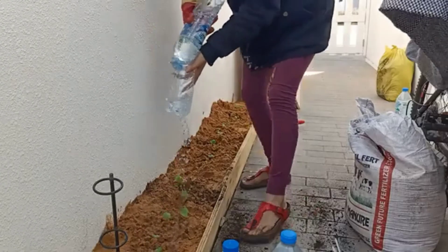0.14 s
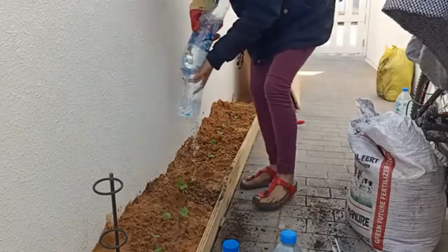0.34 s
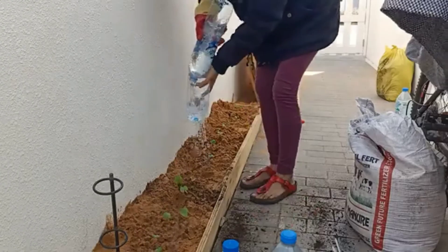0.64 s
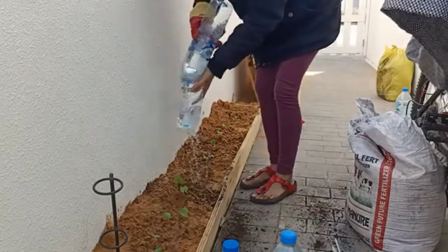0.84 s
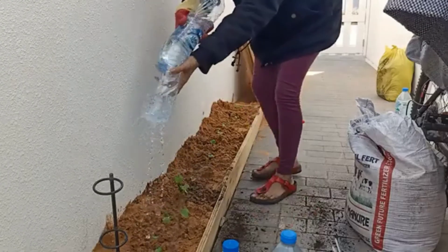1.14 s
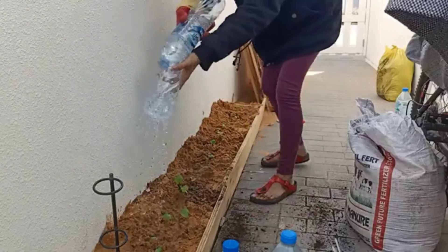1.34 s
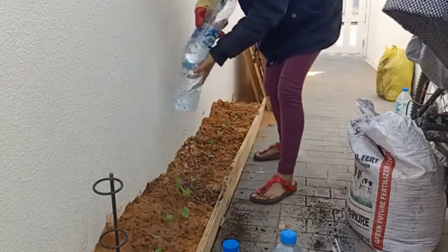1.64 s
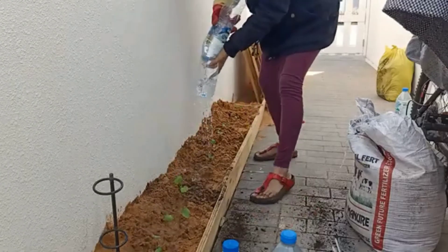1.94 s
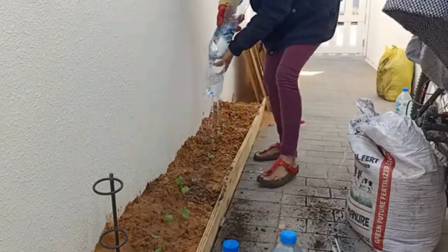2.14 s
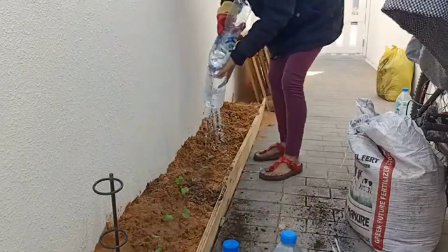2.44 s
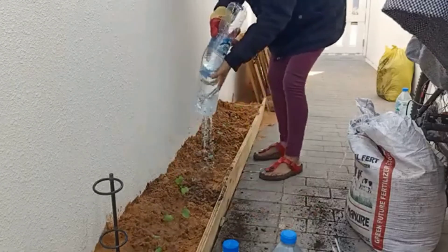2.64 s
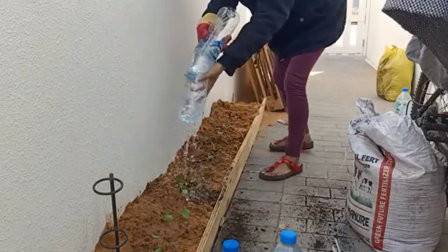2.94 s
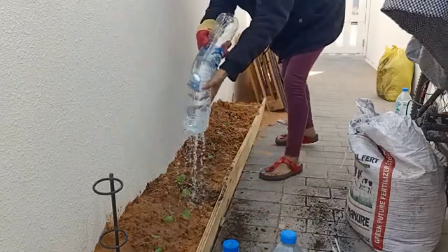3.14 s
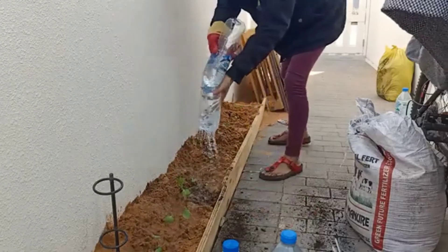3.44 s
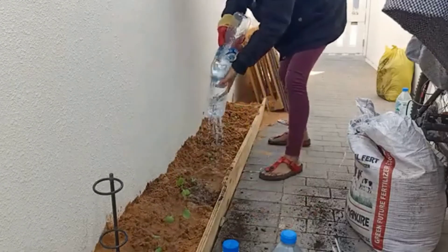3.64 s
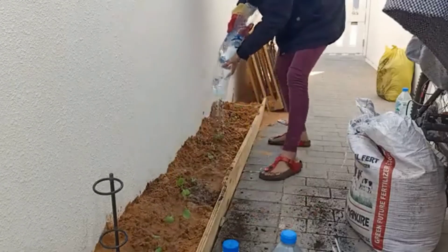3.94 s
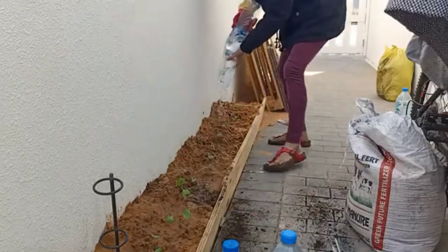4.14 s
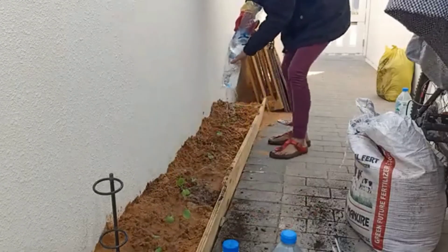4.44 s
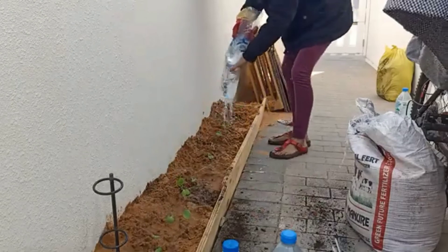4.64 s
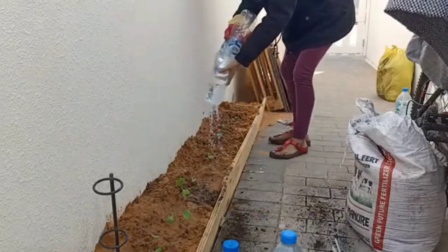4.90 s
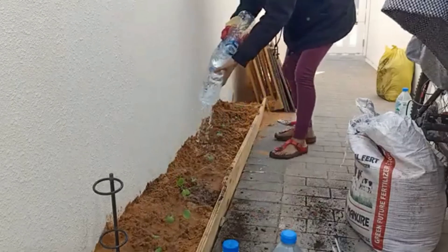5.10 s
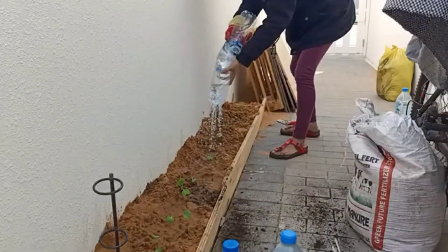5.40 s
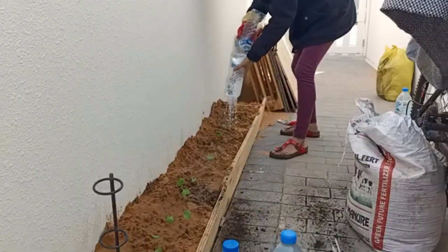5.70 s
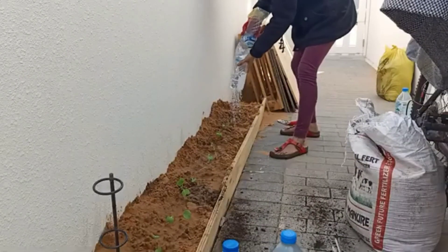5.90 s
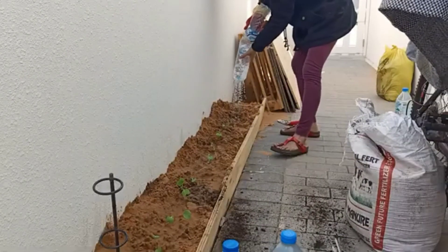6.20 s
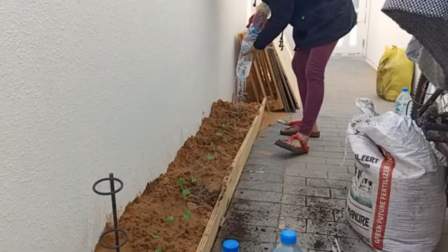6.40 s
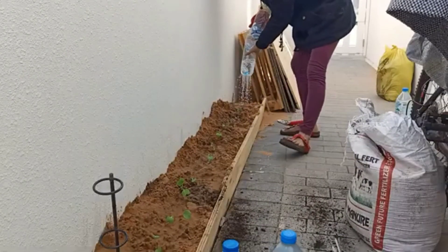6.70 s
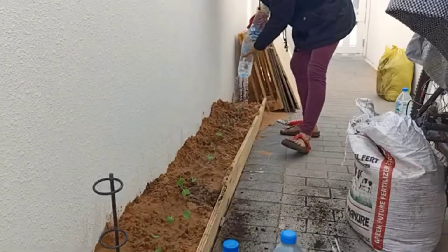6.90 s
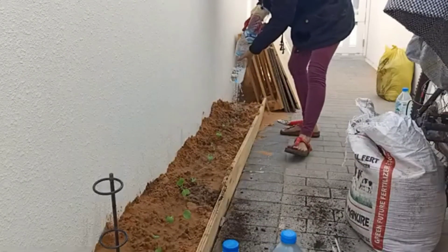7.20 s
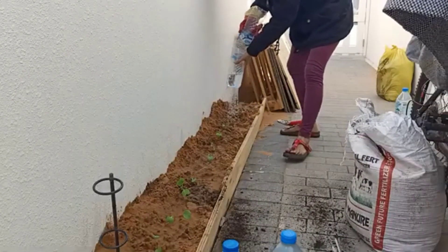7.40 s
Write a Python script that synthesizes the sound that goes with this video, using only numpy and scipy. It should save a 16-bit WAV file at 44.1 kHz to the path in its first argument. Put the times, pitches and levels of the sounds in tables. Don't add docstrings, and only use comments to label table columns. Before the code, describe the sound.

Close stereo pickup in a narrow walled passage: a pierced plastic bottle sprays fine water onto sandy soil in irregular spurts. Bright drips, small plops and dry ticks scatter over it, with low glugs of air entering the bottle. The wall snaps loudly just past four seconds and hardest just past five, after which everything sounds quieter. A cooling unit hums steadily underneath.

```python
import sys
import numpy as np
from scipy import signal
from scipy.io import wavfile
from scipy.ndimage import uniform_filter1d, map_coordinates

SR = 44100
rng = np.random.default_rng(int(sys.argv[2]) if len(sys.argv) > 2 else 0)


def transcribe(signal):
    frames = np.atleast_2d(signal).T
    limited = np.clip(frames, -1, 1)
    pcm = np.round(limited * 32767).astype(np.int16)
    wavfile.write(sys.argv[1], SR, pcm)


def gain_from_db(level_db):
    decades = np.asarray(level_db, float) / 20
    return 10 ** decades


N = 332955
TIME = np.arange(N) / SR

# f/Hz, level/dB per Hz
RUMBLE_SPECTRUM = [(12, -43), (20, -7.5), (81, -3.5), (122, -5.5), (249, -6), (302, -8.5), (431, -12.5),
                   (481, -14.5), (687, -29.5), (1740, -34.5), (1890, -36.0), (3020, -33.5), (3370, -38.5),
                   (4430, -36), (14000, -39)][:-2]
# f/Hz, likeness/0..1
RUMBLE_LIKENESS = [(30, .74), (75, .75), (140, .86), (300, .95), (640, .75), (1500, .2), (5000, .05)]
# f/Hz, t60/s
PASSAGE_DECAY = [(300, 0.6), (1000, 0.24), (3000, 0.36), (8000, 0.18), (15000, 0.016)]
# t/s, drop/dB
GAIN_DROPS = [
    (0.0, 3.5),
    (4.225, 2.5),
    (5.31, 9),
]
# t/s, level/dB, low part/dB, high part/dB, t60/s
WALL_SNAPS = [
    (0.62, -14, 13, -12, 0.013),
    (4.224, -1, -7, -21, 0.014),
    (5.24, -35.5, -21, -2, 0.012),
    (5.255, -40, -44, -18, 0.011),
    (5.262, -30, -28, -15, 0.014),
    (5.29, -25, -18, -10, 0.014),
    (5.31, 1, -8.5, -2.5, 0.023),
]
# f/Hz, width/Hz, level/dB
WALL_RESONANCES = [(614, 560, -11), (980, 740, -5.5), (2350, 1000, 3.5), (3320, 1400, 4.5),
                   (4500, 2100, 2.5), (5850, 4500, 2), (10500, 6100, -6)]
# t/s, level/dB, f/Hz, knock against ring/dB
AIR_GLUGS = [(.105, -25, 380, -8), (.251, -26.5, 517, 3), (.62, -34, 1140, 11), (1.091, -14.5, 420, -23),
             (1.16, -16, 426, -28), (1.235, -26, 480, -1), (1.468, -19.5, 343, -8),
             (1.519, -22.5, 544, -22), (1.577, -21, 388, -23), (1.763, -19.5, 463, -18),
             (1.847, -19, 403, -8), (1.868, -19, 392, -3), (2.318, -20.5, 415, -1), (2.586, -25, 374, -13),
             (2.636, -24, 375, -24), (2.667, -21, 517, -1), (3.118, -21.5, 517, -8), (3.797, -15, 430, -31),
             (3.822, -17.5, 480, -37), (3.89, -17.5, 490, -3), (4.195, -22.5, 415, -9),
             (4.225, -15.5, 784, 6), (4.907, -28.5, 437, 5), (5.309, -30, 906, 14),
             (5.632, -25.5, 448, -22), (5.93, -30, 460, -3), (6.635, -28.5, 450, -7)]
# t/s, length/s, level/dB, f/Hz
WATER_GUSHES = [
    (0.189, 0.12, -38, 4930),
    (2.103, 0.075, -40.5, 4500),
    (2.35, 0.044, -25.5, 5630),
    (4.451, 0.095, -39, 5470),
    (5.929, 0.041, -49, 900),
    (6.127, 0.016, -44, 5500),
]
# t/s, level/dB, f/Hz
RINGING_DRIPS = [(.2405, -23, 5620), (.2793, -18.5, 6400), (.39, -21.5, 5160), (1.1504, -19, 6560),
                 (1.183, -14, 6240), (1.244, -18, 6230), (1.2925, -19, 6070), (1.3252, -19, 6900),
                 (1.366, -20, 6600), (1.398, -16, 6300), (1.432, -22, 5540), (1.5266, -13.5, 5570),
                 (1.614, -15.5, 7100), (1.7245, -13.5, 6740), (2.044, -22, 6460), (2.105, -21, 5200),
                 (2.3478, -18, 5200), (2.8734, -23, 5740), (3.1826, -20, 6010), (3.327, -18.5, 5800),
                 (3.3782, -22.5, 7680), (3.5436, -24, 6000), (3.5978, -16.5, 4940), (4.0801, -24, 8530),
                 (4.1086, -23, 5670), (5.1925, -24, 5750), (5.256, -14, 6680), (5.29, -17, 6570),
                 (6.137, -25, 5800), (6.6258, -28, 5300)]
# t/s, level/dB, f/Hz, sharpness/pitch over width
PUDDLE_PLOPS = [(0.1933, -32, 3000, 5), (.53, -23.5, 4600, 3.3), (.6215, -11.5, 3060, 2),
                (.65, -28, 2350, 5), (.691, -23, 4660, 2.6), (.834, -23, 3520, 2.3), (1.02, -23, 2170, 4.9),
                (1.0515, -29, 3700, 6.6), (1.0934, -29.5, 2090, 6.3), (1.851, -21.5, 3570, 3.1),
                (2.152, -20.5, 4350, 3.5), (2.2523, -25.5, 4080, 4.8), (2.3343, -28, 3100, 5.1),
                (3.5725, -18.5, 3320, 3.6), (3.688, -22, 2940, 4.2), (3.795, -33, 2100, 4.5),
                (3.8907, -20.5, 2820, 7.8), (4.1567, -29, 2070, 7.9), (4.223, -13, 2560, 6.1),
                (4.6435, -33.5, 1970, 6.5), (4.855, -23, 4570, 6.2), (4.9323, -26, 2840, 3.2),
                (5.0983, -18.5, 3900, 8.1), (5.31, -15, 4500, 4.4), (5.5372, -25.5, 4570, 7.8),
                (5.605, -35, 2350, 4.5), (6.9273, -29, 4620, 3.7), (7.0473, -19, 4360, 14),
                (7.1043, -24, 4560, 4.9)]
# t/s, level/dB
STONE_TICKS = [(.194, -18), (.2778, -16.5), (.8071, -18), (1.0041, -29), (1.4351, -17), (1.5594, -24),
               (1.698, -12.5), (1.725, -9.5), (1.9135, -21), (2.1046, -19), (2.3476, -17), (2.6663, -21),
               (3.1512, -20), (3.1822, -23), (3.3278, -17), (3.3403, -22), (3.5438, -18), (3.5733, -17),
               (3.69, -18), (3.8028, -14), (4.2248, -9), (4.4877, -24), (4.5221, -16.5), (4.8534, -15),
               (5.0908, -23), (5.239, -18), (5.3103, -13.5), (5.5363, -25), (6.5984, -34), (6.6757, -37)]
# f/Hz, level/dB per Hz
SPRAY_SPECTRUM = [(350, -4), (600, -2.5), (817, -5), (1360, -12.5), (2040, -9.0), (3130, -4.0), (3780, -5),
                  (5740, -3.5), (9820, -7), (13600, -5.5), (14900, -9)][:-2] + [(17000, -9.5)]
# t/s, level/dB
HAND_PRESSURE = [(0, -42.5), (.48, -57), (.97, -52), (1.3, -45), (1.85, -41.5), (2.1, -63), (2.56, -50.5),
                 (2.9, -43), (3.3, -40), (3.95, -43), (4.06, -49.5), (4.84, -48), (5.22, -45), (5.4, -44),
                 (5.86, -53.5), (6.37, -53), (6.9, -46.5), (7.55, -48)]
# t/s, hold/s, level/dB
SWING_SPURTS = [(0, 0.12, -44.5), (.21, 0.043, -41.5), (0.396, 0.0046, -45), (0.563, 0.093, -40.5),
                (0.705, 0.15, -42.5), (1.155, 0.0061, -37), (1.274, .02, -40), (1.47, 0.046, -39),
                (1.555, .02, -36), (1.658, 0.12, -44.5), (1.932, 0.031, -37.5), (2.137, 0.0089, -39.5),
                (2.3, 0.082, -39.5), (2.45, .02, -58), (2.64, 0.043, -39.5), (2.838, 0.058, -40),
                (3.123, 0.025, -42), (4.113, .02, -44), (4.222, .005, -36.5), (4.86, .005, -60),
                (5.285, 0.028, -37), (5.746, 0.044, -52.5), (6.06, .02, -54), (6.59, 0.058, -47),
                (6.893, .08, -51.5), (7.047, 0.049, -46), (7.37, 0.041, -49)]

MACHINE_DB, HUM_HZ, WHINE_HZ = -32.5, 74.56, 296.9
DUCK_S, RECOVER_S = 0.019, 2.2
GLUG_T60_S = 0.043
DRIP_SHARP = 3
TICK_UNDER_DB = 10
GRIT_PER_S, GRIT_OVER_DB = 16, 13
SWELL_DB_PER_S, FADE_DB_PER_S = 209, 116
FINE_PER_DB = 0.38
STARVE_DB, STARVED_GAIN = 4.0, .02
BODY_EDGE_HZ, CLICK_EDGE_HZ = 15080, 16150


def evened(x):
    return x / np.sqrt(np.mean(x ** 2) + 1e-20)


def read(points, hz):
    f, value = np.transpose(points)
    return np.interp(np.log(hz + 1), np.log(f + 1), value)


def add(mix, s, sound, pan_db=0, lag=4):
    for ear, late, side in zip(mix, (lag, 0), (.5, -.5)):
        part = ear[round(s * SR) + late:][:len(sound)]
        part += gain_from_db(side * pan_db) * sound[:len(part)]


def resonate(x, hz, width):
    sharpness = max(hz / width, .3)
    return signal.lfilter(*signal.iirpeak(np.clip(hz, 20, .45 * SR), sharpness, SR), x)


def wander(hz):
    steps = rng.standard_normal(2000)
    return map_coordinates(steps, [TIME * hz], order=3)


def ducked_db():
    total = 0
    for s, drop_db in GAIN_DROPS:
        since = np.maximum(TIME - s, 0)
        fall = 1 - (s > 0) * np.exp(-since / DUCK_S)
        total = total + drop_db * np.exp(-since / RECOVER_S) * fall
    return -total


def machine():
    frames, hz = N // 512 + 5, np.fft.rfftfreq(2048, 1 / SR)
    a, b, c, d = rng.standard_normal((frames, 1025, 4)).T
    same = np.clip(read(RUMBLE_LIKENESS, hz), -1, 1)[:, None]
    left = a + 1j * b
    right = same * left + np.sqrt(1 - same ** 2) * (c + 1j * d)
    shaped = np.array([left, right]) * gain_from_db(read(RUMBLE_SPECTRUM, hz))[:, None]
    rumble = evened(signal.istft(shaped, nperseg=2048, noverlap=1536)[1][:, :N])
    phase = 2 * np.pi * np.cumsum(HUM_HZ + 0.56 * wander(3.42)) / SR
    hum = np.sqrt(2) * np.sin(phase) * gain_from_db(.8 * wander(12.0))
    whine = resonate(rng.standard_normal(N), WHINE_HZ, 27.6)
    whine = evened(resonate(whine, WHINE_HZ, 27.6))
    blend = gain_from_db(-.5) * hum + gain_from_db(-0.5) * rumble + gain_from_db(-8.5) * whine
    return gain_from_db(MACHINE_DB + ducked_db()) * blend * gain_from_db([[-.4], [.4]])


def passage(x):
    taps = np.zeros((2, SR // 2))
    at = np.arange(100, SR // 2 - 20, 20) + rng.integers(0, 20, (2, (SR // 2 - 101) // 20))
    np.put_along_axis(taps, at, rng.choice([-1., 1.], at.shape), 1)
    hz, t, z = signal.stft(taps, SR, nperseg=128)
    decay = gain_from_db(-60 * t / 0.081) + gain_from_db(-1.5 - 60 * t / read(PASSAGE_DECAY, hz)[:, None])
    tail = signal.istft(z * decay, SR, nperseg=128)[1]
    return signal.fftconvolve(x, tail / np.linalg.norm(tail[0]), axes=1)[:, :N]


def snaps():
    out, t = np.zeros((2, N)), np.arange(4000) / SR
    noises = rng.standard_normal((len(WALL_SNAPS), 2, 4000))
    for (s, db, low_db, high_db, t60), noise in zip(WALL_SNAPS, noises):
        envelope = gain_from_db(-60 * t / t60) + gain_from_db(-9.5 - 60 * t / 0.076)
        attack = np.minimum(t / 0.00201, 1) ** 2
        cracks = (noise + 0.26 * noise[::-1]) * envelope * attack
        tilts_db = [low_db + 15, low_db + 15, 0, 0, 0, 0, high_db + 6]
        snap = 0
        for tilt_db, (hz, width, own_db) in zip(tilts_db, WALL_RESONANCES):
            snap = snap + gain_from_db(own_db + tilt_db) * resonate(resonate(cracks, hz, width), hz, 2 * width)
        out[:, round(s * SR):][:, :len(t)] += gain_from_db(db) * snap / abs(snap).max()
    return out


def glugs():
    out, t = np.zeros((2, N)), np.arange(6000) / SR
    noises = rng.standard_normal((len(AIR_GLUGS), 6000))
    for (s, db, hz, knock_db), noise in zip(AIR_GLUGS, noises):
        wobble = evened(resonate(resonate(noise, hz, 270), hz, 370))
        bubble = np.sin(2 * np.pi * hz * t * (1 + 1.9 * t)) + 0.65 * wobble
        knock = evened(resonate(resonate(resonate(noise, 920, 370), 990, 460), 990, 460))
        both = bubble + gain_from_db(knock_db - 9.5) * knock
        swell = (1 - np.exp(-t / .004)) ** 2
        fade = gain_from_db(db + 3.0 - 60 * t / GLUG_T60_S)
        add(out, s - .003, fade * swell * both, -2.5, lag=0)
    return out


def gushes():
    out, t = np.zeros((2, N)), np.arange(8000) / SR
    noises = rng.standard_normal((len(WATER_GUSHES), 2, 8000))
    for (s, length, db, hz), noise in zip(WATER_GUSHES, noises):
        crackle = evened(resonate(noise * abs(noise) ** 1.4, hz, 0.66 * hz))
        shape = np.clip(t / 0.0026, 0, 1) * np.clip((length - t) / 0.0065, 0, 1)
        out[:, round(s * SR):][:, :len(t)] += gain_from_db(db) * crackle * shape
    return out


def flow_db(t):
    power = gain_from_db(2 * np.interp(t, *np.transpose(HAND_PRESSURE)))
    for s, hold, db in SWING_SPURTS:
        away_db = SWELL_DB_PER_S * np.maximum(s - t, 0) + FADE_DB_PER_S * np.maximum(t - s - hold, 0)
        power = power + gain_from_db(2 * (db - away_db))
    return 10 * np.log10(power)


def grit():
    at, size = rng.random((round(GRIT_PER_S * N / SR), 2)).T
    s = at * TIME[-1]
    return list(zip(s, flow_db(s) + GRIT_OVER_DB + 8.1 * size))


def ticks():
    out, t = np.zeros((2, N)), np.arange(600) / SR
    touches = [(s, db - TICK_UNDER_DB) for s, db, *_ in RINGING_DRIPS + PUDDLE_PLOPS]
    rows = STONE_TICKS + touches + grit()
    for (s, db), noise in zip(rows, rng.standard_normal((len(rows), 602))):
        click = resonate(noise[2:] * gain_from_db(-60 * t / .009), 9500, 11000)
        lag = 5 + round(3 * noise[1].clip(-1, 1))
        add(out, s, gain_from_db(db + 1.5) * click / abs(click).max(), lag=lag)
    return out


def drips():
    out, t = np.zeros((2, N)), np.arange(3000) / SR
    rows = [(*row, DRIP_SHARP) for row in RINGING_DRIPS] + PUDDLE_PLOPS
    for (s, db, hz, sharp), noise in zip(rows, rng.standard_normal((len(rows), 3002))):
        splash = noise[2:] * gain_from_db(-60 * t / (0.012 + 50 / hz)) * np.minimum(t / 0.002, 1)
        ring = resonate(resonate(splash, hz, hz / sharp), hz, 3 * hz / sharp)
        lag = 5 + round(3 * noise[1].clip(-1, 1))
        add(out, s, gain_from_db(db) * ring / abs(ring).max(), 1.5 * noise[0], lag=lag)
    return out


def spray():
    jet_db = np.interp(TIME, TIME[::64], flow_db(TIME[::64]))
    true_db = jet_db - 1.37 * ducked_db()
    landing = rng.random(N) < 2500 / SR
    size = gain_from_db(3.8 * np.minimum(rng.exponential(1, N), 4.2)) * landing
    kind, drops = rng.integers(0, 30, N), np.zeros((2, N))
    t = np.arange(900) / SR
    for k, hz in enumerate(np.geomspace(400, 14000, num=30)):
        rise = t / (0.00014 + .5 / hz)
        grain = np.sin(2 * np.pi * hz * t) * rise * np.exp(-rise)
        train = signal.oaconvolve(size * (kind == k), grain / np.linalg.norm(grain))[:N]
        start_s, pan_db = rng.integers(0, 9) / SR, rng.normal(0, 11.0)
        add(drops, start_s, train * np.sqrt(hz), pan_db, lag=rng.integers(0, 10))
    wet = evened(drops) + 2.6 * rng.standard_normal((2, N))
    hz, t, z = signal.stft(wet, SR, nperseg=256)
    z /= np.sqrt(np.mean(abs(z) ** 2, (0, 2)))[:, None]
    patches = uniform_filter1d(rng.standard_normal(z.shape[1:]), 9, 0)
    patches = evened(uniform_filter1d(patches, 7, 1))
    finer = FINE_PER_DB * np.interp(t, TIME, true_db - np.mean(true_db))
    tilt_db = np.log2(hz[:, None] / 6500 + 0.096) * 0.6 * finer
    colour = gain_from_db(read(SPRAY_SPECTRUM, hz)[:, None] + tilt_db)
    colour /= np.sqrt(np.mean(colour ** 2, 0))
    spatter = evened(signal.istft(z * colour * gain_from_db(2.76 * patches), SR, nperseg=256)[1][:, :N])
    spray_floor = gain_from_db(MACHINE_DB + ducked_db() - 40)
    return spatter * np.hypot(gain_from_db(jet_db + 4.5 + 1.57 * wander(90.)), spray_floor)


def scene():
    drops = drips() + ticks() + gushes()
    bottle = glugs() + snaps()
    echoes = passage(gain_from_db(-10) * drops + gain_from_db(-8.0) * bottle)
    return drops + bottle + echoes + spray() + machine()


def starve(x):
    hz, t, z = signal.stft(x, SR, nperseg=1024)
    band_db = 10 * np.log10(uniform_filter1d((abs(z) ** 2).mean(0), size=5, axis=0) + 1e-16)
    share_db = uniform_filter1d(band_db - np.median(band_db, axis=1, keepdims=True), size=4, axis=1)
    weak = share_db < uniform_filter1d(share_db, size=150, axis=0) - STARVE_DB
    mid = (hz[:, None] > 2400) & (hz[:, None] < 4600)
    return signal.istft(z * np.where(weak & mid, STARVED_GAIN, 1), SR, nperseg=1024)[1][:, :N]


def low_pass(x):
    return signal.sosfilt(signal.butter(12, 16260, fs=SR, output="sos"), x)


def record(dry):
    loud = starve(np.clip(dry, -1, 1))
    body = signal.oaconvolve(loud, signal.firwin(401, BODY_EDGE_HZ, fs=SR)[None], "same")
    wide = signal.oaconvolve(loud, signal.firwin(401, CLICK_EDGE_HZ, fs=SR)[None], "same")
    top = wide - body
    power = (top ** 2).mean(0)
    sudden = uniform_filter1d(power, size=128) > 5.5 * uniform_filter1d(power, size=4000)
    mix = body + uniform_filter1d(0.65 * sudden, size=256) * top
    return low_pass(mix)


dry = scene()
out = record(dry)
transcribe(out)
```